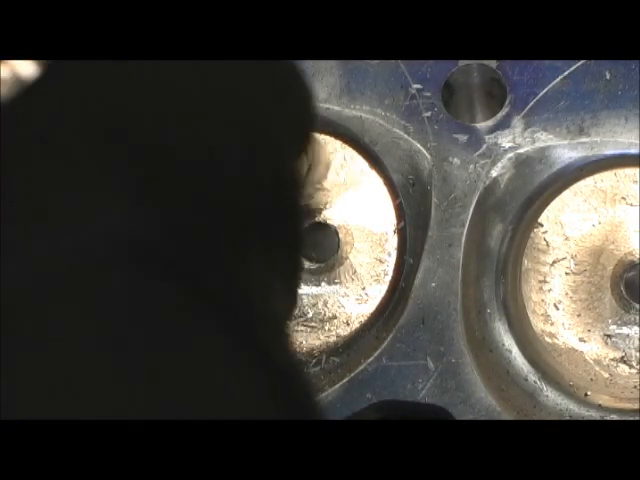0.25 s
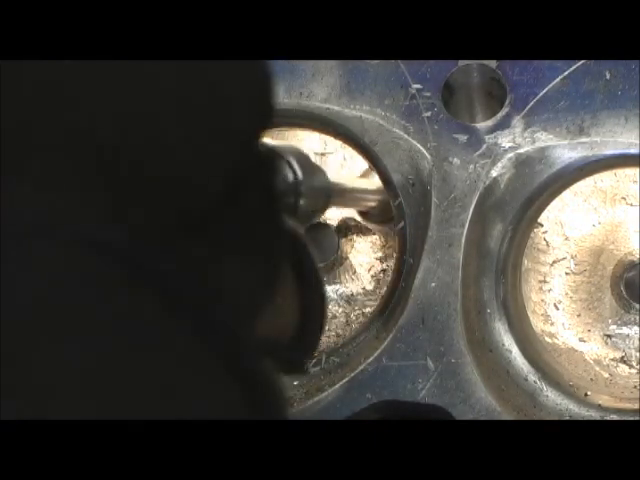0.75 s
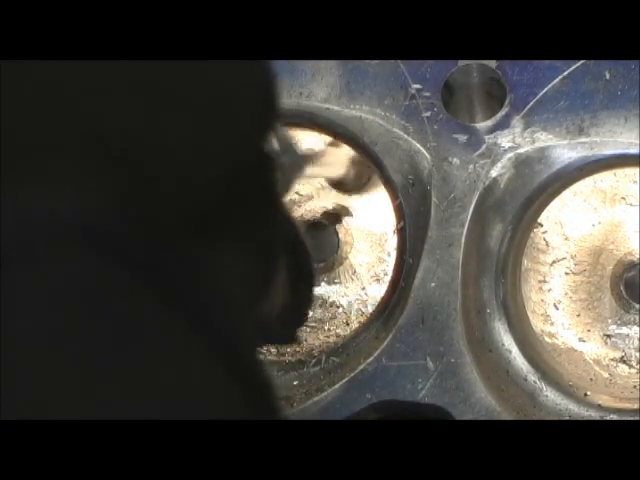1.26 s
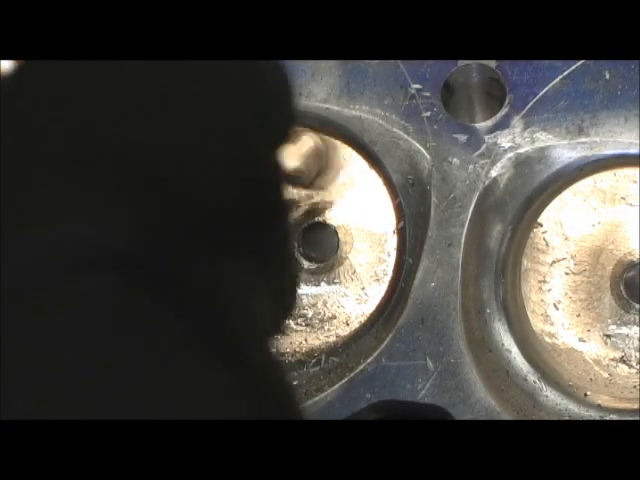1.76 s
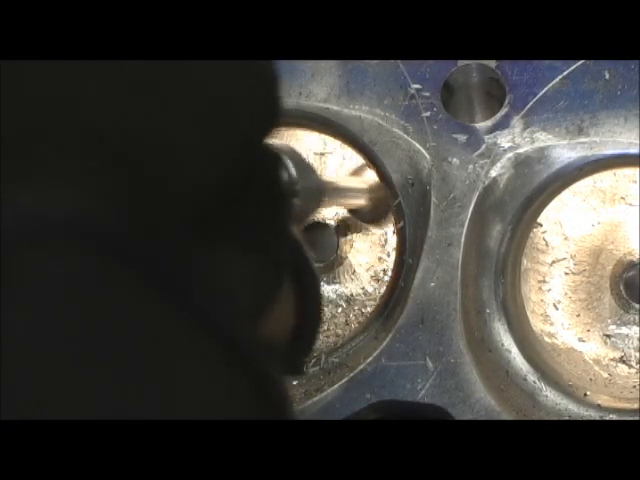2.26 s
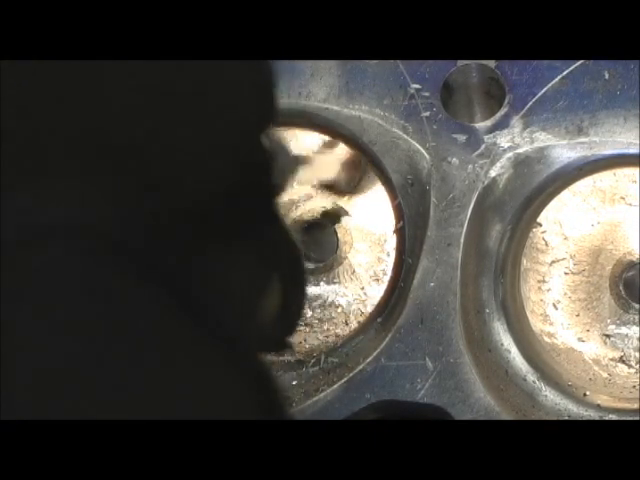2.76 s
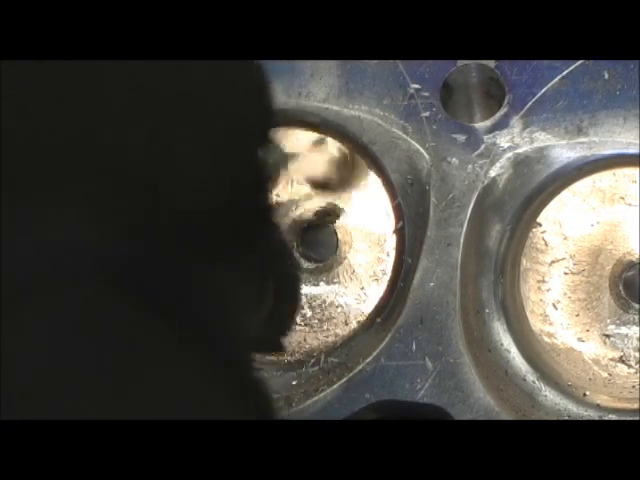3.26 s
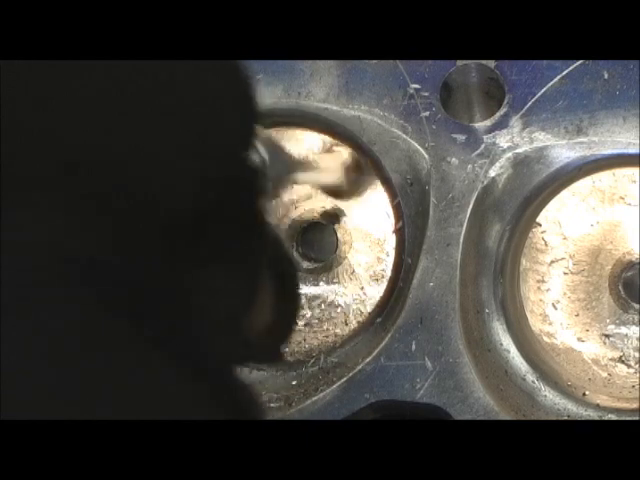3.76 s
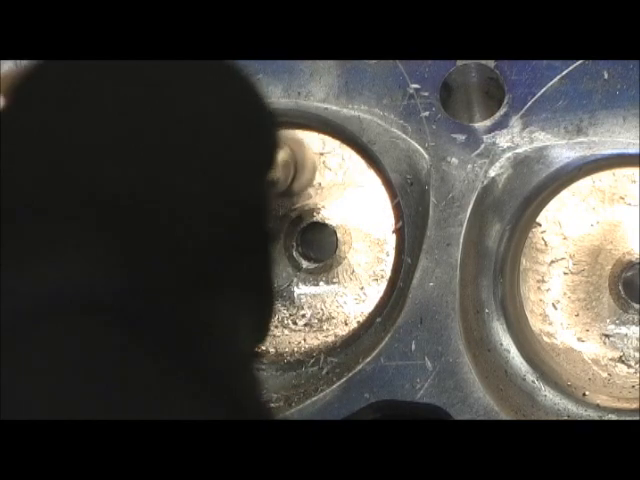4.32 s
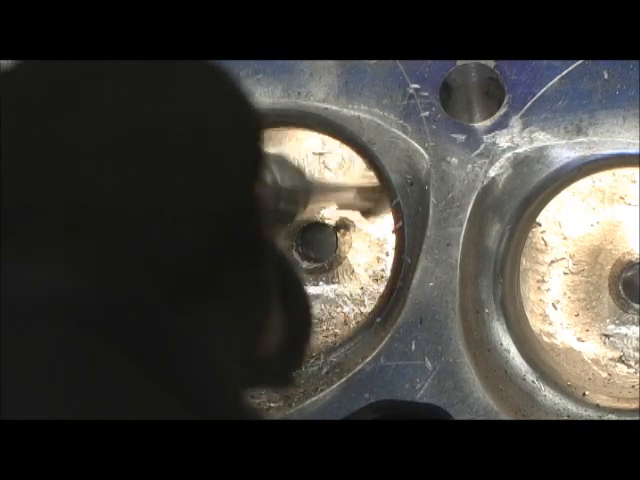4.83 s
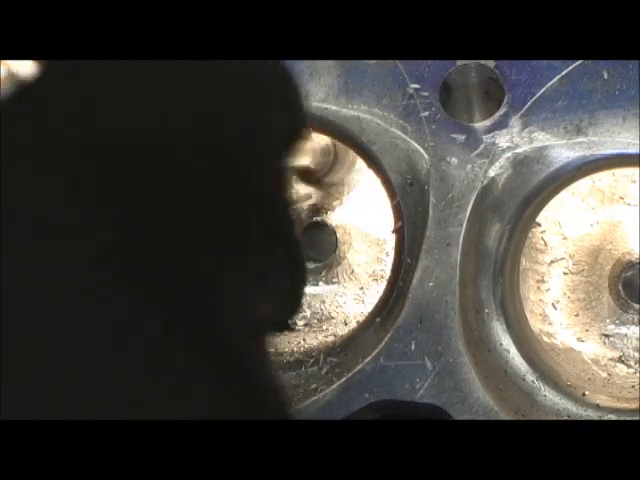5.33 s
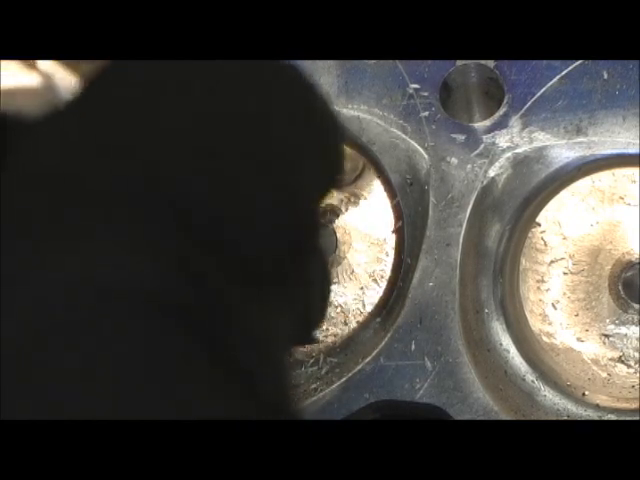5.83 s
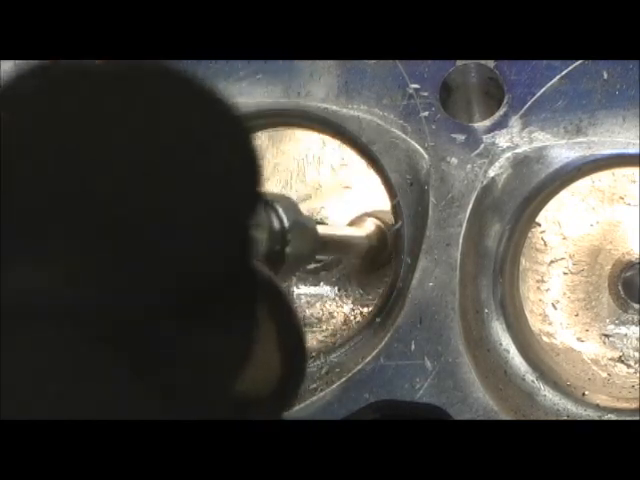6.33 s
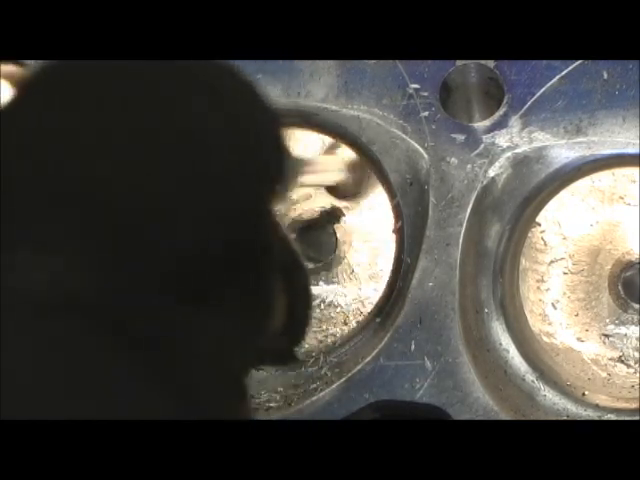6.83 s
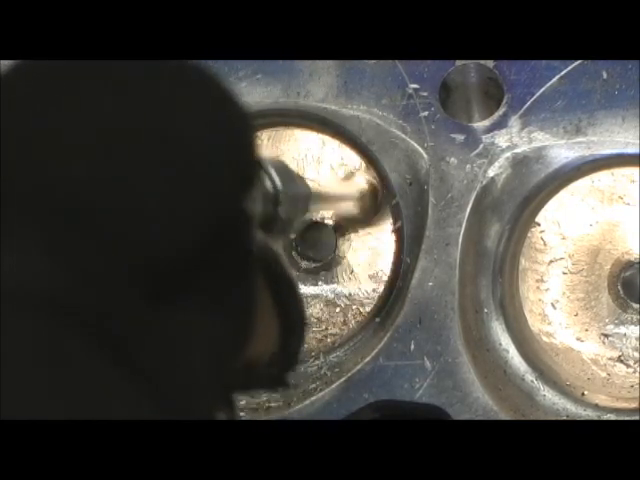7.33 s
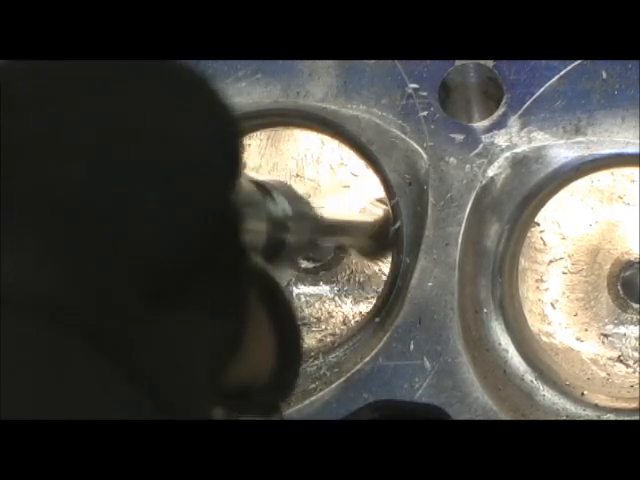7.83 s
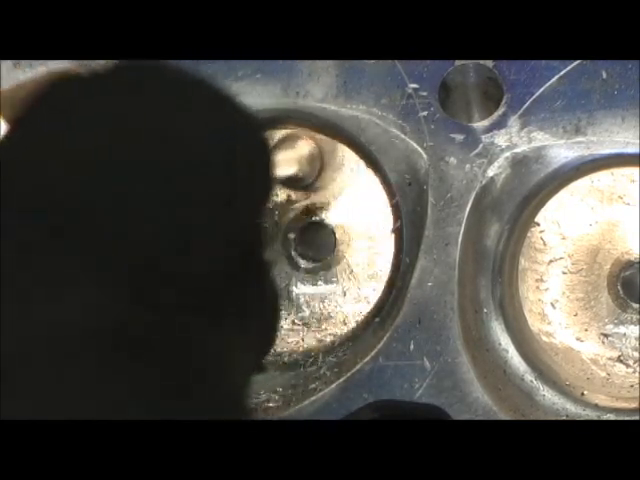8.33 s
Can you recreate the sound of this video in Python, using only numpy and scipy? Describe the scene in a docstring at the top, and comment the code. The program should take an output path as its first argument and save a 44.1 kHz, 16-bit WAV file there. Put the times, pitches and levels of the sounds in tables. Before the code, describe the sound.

An air die grinder runs continuously, very close, its burr working to and fro inside a metal casting. The high whine sags and recovers several times a second, over rough scratching, exhaust roar and faint shaft hum. Metal walls ring briefly in turn and tiny clicks mark snags. Toward the end strokes flutter more, and the whine drops at the last moment. Low workshop rumble sits behind; close stereo microphone, bass centred and treble wide.

```python
"""An air die grinder sweeps a carbide burr to and fro inside a cylinder head port, close by in a workshop.
Its five motor vanes make a sine whine that bogs down and recovers with each stroke, over a shaft hum.
Shaped noise makes the burr's scratch and the roar of exhaust air and chips; resonances ring the casting.
Singing tones mark the walls, short bursts are snags, and low noise with booms is the workshop."""
import sys
import numpy as np
from scipy import signal
from scipy.fft import rfft, irfft
from scipy.io import wavfile
from scipy.ndimage import uniform_filter1d

SR = 44100
rng = np.random.default_rng(int(sys.argv[2]) if len(sys.argv) > 2 else 0)


def output_pcm(signal):
    """Save a mono or channel-first signal as 16-bit PCM at the path in sys.argv[1].

    Samples are clipped to [-1, 1] before scaling.
    """
    pcm = np.clip(np.atleast_2d(signal).T, -1, 1) * 32767
    wavfile.write(sys.argv[1], SR, np.round(pcm).astype(np.int16))


N = 378378  # length of the scene [samples]

# strokes of the hand: the motor bogs down at the turn, recovers, then sags; later smoothing rounds the rates
# (slowest moment [s], slowest vane rate [Hz], recovery time [s], fastest vane rate [Hz],
#  bite swell [dB], low wall swell [dB], high wall swell [dB], shaft overtone swell [dB])
HAND_STROKES = [(-0.2, 1200, 0.15, 1300, 0.0, -45, -45, -45), (0.15, 1248, 0.14, 1362, 1.5, -31, -45, -41),
                (0.5, 1245, 0.13, 1375, 1.0, -31, -31, -41), (0.92, 1248, 0.12, 1350, 1.5, -31, -31, -41),
                (1.32, 1355, 0.028, 1392, 1, -31, -31.5, -41), (1.62, 1332, 0.07, 1407, 2, -32, -38, -36),
                (1.959, 1292, 0.13, 1368, 1.5, -38, -45, -41),
                (2.341, 1230, 0.15, 1397, 3.5, -29, -31, -35), (2.79, 1318, 0.02, 1365, 2.5, -36, -33, -35),
                (3.07, 1268, 0.1, 1406, 3.5, -30, -32, -30.5),
                (3.42, 1283, 0.087, 1398, 4.5, -32, -38, -31), (3.77, 1251, 0.094, 1378, 4, -32, -35, -34),
                (3.91, 1299, 0.28, 1330, 1.5, -45, -45, -41), (4.24, 1267, 0.12, 1383, 3.5, -29, -39, -35),
                (4.631, 1283, 0.095, 1384, 3.5, -32, -32, -31),
                (4.96, 1299, 0.051, 1367, 0.5, -45, -32.5, -30.5),
                (5.12, 1301, 0.13, 1313, -0.5, -45, -45, -41), (5.28, 1245, 0.31, 1306, 1.0, -45, -45, -41),
                (5.69, 1141, 0.28, 1310, 1, -36, -42, -41), (6.26, 1278, 0.1, 1309, 2.5, -45, -49, -41),
                (6.42, 1256, 0.071, 1304, 2, -45, -40, -41), (6.78, 1315, 0.02, 1375, 2.5, -40, -45, -41),
                (7.05, 1336, 0.07, 1388, 3.5, -45, -43, -41), (7.19, 1320, 0.17, 1340, 3.5, -45, -38, -41),
                (7.57, 1300, 0.059, 1383, 3.5, -45, -48, -41), (7.7, 1300, 0.19, 1343, 0, -45, -31, -41),
                (7.97, 1263, 0.1, 1330, 1.0, -45, -39, -41), (8.14, 1253, 0.11, 1323, 0, -45, -47, -41),
                (8.3, 1268, 0.11, 1326, 3.0, -31.5, -43, -41), (8.54, 1125, 0.17, 1206, 2.5, -45, -45, -41)]
# slow levels: (time [s], vane tone [dB], shaft hum before its resonance [dB], bite [dB], roar [dB],
#  low wall between rings [dB], high wall between rings [dB])
SLOW_LEVELS = [(0, -29.5, -44, -24.5, -23, -48, -44), (.7, -27.5, -45, -24.5, -23, -46, -45),
               (1.5, -29.5, -43.5, -25, -24, -44, -44), (2.2, -29, -44, -24, -23.5, -44, -35),
               (3, -29.5, -47, -23.5, -26, -41, -39.5), (3.9, -27, -46, -25.5, -24, -43, -43),
               (4.7, -27, -51, -23, -24, -44, -37), (5.3, -28, -42.5, -25, -22.5, -50, -38),
               (5.8, -30, -44.5, -23.5, -23.5, -48, -41), (6.4, -24, -41, -24.5, -22.5, -46, -33.5),
               (6.9, -26, -43.5, -25, -22.5, -44, -37.5), (7.6, -26.5, -45.5, -23.5, -23, -49, -33.5),
               (8.2, -24, -41, -23.5, -22, -46, -37), (8.45, -27, -47, -23, -24, -33, -37),
               (8.58, -31, -46, -22, -21, -37, -33)]
# brief dips in level, deepest in the roar, slight in the vane tone: (time [s], depth in the bite [dB])
LEVEL_DIPS = [(0.35, 1), (0.58, 3.5), (2.81, 3.5), (2.97, 0.5), (3.44, 2), (3.81, 0.5), (4.04, 3.5),
              (4.29, 1), (4.66, 5.5), (4.9, 1.5), (4.96, 3.5), (5.34, 1.5), (5.7, 2), (7.24, 2.5)]
# bench resonance under the shaft hum: (centre [Hz], width [Hz])
HUM_RESONANCE = (263.4, 9)
# a second resonance, under twice the shaft rate: (centre [Hz], width [Hz], drive over the hum's [dB])
HUM_OCTAVE_RESONANCE = (516, 21, -3.5)
# shaft overtones heard through a port resonance: (multiple of the shaft rate [times], centre [Hz], width [Hz])
SHAFT_OVERTONES = [(7, 1950, 250), (9, 2470, 300)]
# colour of the burr's scratch: (frequency [Hz], relative level per Hz [dB])
SCRATCH_COLOUR = [(1500, -30), (3000, -4), (6000, -8), (8200, 0), (9600, -4), (11500, -8.5), (12900, -15.5),
                  (14500, -12), (15800, -21)]
# resonances of the casting: (centre [Hz], width [Hz])
CASTING_MODES = [(2000, 90), (2500, 120), (2833, 30), (4530, 16), (5610, 18), (7355, 24), (7998, 45),
                 (8257, 90), (8451, 32), (9100, 150), (10833, 22), (11787, 22)]
# level of each casting resonance over the bite, in the same order: (level [dB])
CASTING_LEVELS = [-11.5, -9.5, -14.5, -17, -23.5, -33, -27, -11, -19, -15.5, -38, -22.5]
# colour of the roar of air and chips: (frequency [Hz], relative level per Hz [dB])
ROAR_COLOUR = [(410, -71), (700, -28), (1050, -2), (1210, -8), (1340, 0.5), (1800, -2.5), (1990, 3),
               (2290, 0), (2550, 1), (3660, -6.5), (6000, -12.5), (7800, -2.5), (13200, -120)]
# the two walls that sing, low then high: (centre [Hz], width [Hz])
WALLS = [(3165, 16), (3341, 7)]
# colour of the workshop rumble: (frequency [Hz], relative level per Hz [dB])
SHOP_COLOUR = [(59, -45), (100, -26), (144, -25.5), (243, -17.5), (500, -9), (778, -13), (1000, -9),
               (1300, -25), (2200, -120)]
# slow changes in the workshop: (time [s], rumble level [dB], change in the deepest booms [dB])
RUMBLE_LEVELS = [(0, -39.5, 0), (1.5, -41, 2.5), (4.6, -42.5, 1.5), (5.2, -39, -1), (6.7, -37.5, -4.5),
                 (7, -39.5, -3.5), (8, -39, -2), (8.58, -38.5, 4.5)]
# room and bench resonances: (centre [Hz], width [Hz], level before slow changes [dB])
SHOP_BOOMS = [(77.4, 27, -62.5), (104, 23, -59.5), (192.8, 18, -54), (222, 18, -53.5), (326.4, 33, -53),
              (406.6, 30, -51.5), (515.2, 21, -47.5), (579, 37, -53.5)]
# the burr snags: (time [s], strength before the knock and edge gains [dB])
BURR_SNAGS = [(0.1393, -8), (0.1867, -10), (0.3288, -9), (0.5039, -9), (1.0611, -8), (1.2769, -9),
              (1.7964, -9), (2.0141, -10), (2.1506, -9), (2.2474, -9), (2.2981, -9), (2.3815, -9),
              (2.7389, -9), (2.7839, -10), (2.8645, -9), (2.935, -9), (2.9927, -10), (3.0349, -10),
              (3.3058, -9), (3.3699, -10), (4.0139, -8), (4.1127, -10), (4.5075, -10), (4.559, -8),
              (4.6013, -9), (4.8522, -8), (4.9313, -7), (5.0356, -8), (5.2712, -9), (5.3773, -8),
              (5.425, -9), (5.6343, -9), (5.8254, -9), (6.5389, -8), (6.9072, -10), (7.0402, -7),
              (7.128, -7), (7.3822, -6), (7.4572, -8), (8.2938, -9)]
# how two microphone ports hear the scene, by side (half their difference) and mid (half their sum):
# (frequency [Hz], side minus mid [dB], in-step share [0-1, signed], quarter-cycle share [0-1, signed])
MIC_PORTS = [(700, -67.5, -0.39, 0), (2360, -75, -0.38, 0), (3770, -23.5, -0.11, -0.087),
             (6440, -8, -0.081, 0.11), (7850, -12.5, -0.36, 0.73), (10900, 0.5, -0.08, 0.68),
             (12900, 0, 0.54, .5), (15500, -4, 0.18, 0.26)]

VANES = 5  # vane pulses in one turn of the shaft
CREST_POWER = 1.8  # rounds the fast crests and leaves the slow turns pointed
DIP_WIDTH_S, DIP_ROAR, DIP_VANE = 0.02, 1.8, 0.31  # last two: dB per dB of the bite's dip
OVERTONE_WIDTH_S = 0.046
BITE_LAG_S, BITE_WIDTH_S = 0.055, 0.04  # the bite swells just after the fastest moment
ROAR_SHARE = 0.26  # the roar follows part of the bite swell [dB per dB]
LOW_WALL_LAG_S, LOW_WALL_WIDTH_S = 0.057, 0.053  # rings after the fastest moment
HIGH_WALL_LEAD_S, HIGH_WALL_WIDTH_S = 0.036, 0.05  # rings before the slowest moment
SNAG_BODY, SNAG_EDGE = (1750, 2000), (8200, 6000)  # resonances (centre [Hz], width [Hz])
TOP_HZ = 15800  # highest pitch that passes


def undb(db):
    """Turn decibels into gain."""
    return 10 ** (np.asarray(db) / 20)


def unit(x):
    """Scale to an rms (average strength) of 1."""
    return x / np.sqrt(np.mean(x ** 2))


def curves(table):
    """Draw the columns of a time table as lines, one value a sample."""
    s, *columns = np.transpose(table)
    return [np.interp(np.arange(N) / SR, s, c) for c in columns]


def over_hz(table):
    """Draw the columns of a frequency table as lines over log frequency, one value a transform bin."""
    hz, *columns = np.transpose(table)
    bin_hz = np.arange(N // 2 + 1) * SR / N
    return [np.interp(np.log(bin_hz + 1), np.log(hz), c) for c in columns]


def colour(x, table):
    """Filter x by the table's frequency levels, then scale to rms 1."""
    return unit(irfft(rfft(x) * undb(over_hz(table)[0]), N))


def ring(x, hz, width_hz):
    """Pass x through one resonance, with gain 1 at its centre."""
    return signal.lfilter(*signal.iirpeak(hz, hz / width_hz, SR), x)


def walk(rate):
    """Wander at random: levels held 1 / rate seconds, smoothed twice, rms 1."""
    hold = max(int(SR / rate), 1)
    steps = np.repeat(rng.standard_normal(N // hold + 1), hold)
    return unit(uniform_filter1d(uniform_filter1d(steps, hold), hold)[:N])


def noise():
    """Two unrelated rows of hiss: what both microphone ports share, and what differs between them."""
    return rng.standard_normal((2, N))


def swells(times, heights, width_s):
    """Add up a bell-shaped swell at each time."""
    t = np.arange(0, N, 64) / SR  # a coarse time grid is enough for slow bells
    bells = np.exp(-.5 * ((t[:, None] - times) / width_s) ** 2)
    return np.interp(np.arange(N) / SR, t, bells @ heights)


def dip_db():
    """Brief bell-shaped dips in level, as a negative number of dB."""
    return -swells(*np.transpose(LEVEL_DIPS), DIP_WIDTH_S)


def vane_rate():
    """Vane rate climbs from each slowest moment to a rounded crest and falls ever faster to the next."""
    s, slow_hz, rise_s, fast_hz = np.transpose(HAND_STROKES)[:4]
    turning_s = np.ravel([s, s + rise_s], order="F")  # slowest, fastest, slowest, ...
    turning_hz = np.ravel([slow_hz, fast_hz], order="F")
    count = np.arange(2 * len(s))
    step = np.interp(np.arange(N) / SR, turning_s, count)
    height = 1 - np.abs(step % 2 - 1) ** CREST_POWER
    climbing = step % 2 < 1
    eased = np.floor(step) + np.where(climbing, height, 1 - height)
    return uniform_filter1d(np.interp(eased, count, turning_hz), size=1500)


def motor():
    """The vane tone wavers and flutters; the shaft hums a fifth as fast; overtones sing in mid recovery."""
    vane_hz = vane_rate() * (1 + 0.00392 * walk(60))
    vane_db, hum_db = curves(SLOW_LEVELS)[:2]
    turn = 2 * np.pi * np.cumsum(vane_hz) / SR / VANES  # shaft angle
    vane_db = vane_db + DIP_VANE * dip_db() + 1.2 * walk(9) + 1.72 * walk(50)
    out = undb(vane_db) * np.sin(VANES * turn)
    out = out + undb(hum_db + 1.6 * walk(4.02)) * ring(np.sin(turn), *HUM_RESONANCE)
    octave_hz, octave_width, octave_db = HUM_OCTAVE_RESONANCE
    octave = ring(np.sin(2 * turn), octave_hz, octave_width)
    out = out + undb(hum_db + octave_db + 3.1 * walk(7)) * octave
    s, _, rise_s, *_, sing_db = np.transpose(HAND_STROKES)
    sing = swells(s + 0.7 * rise_s, undb(sing_db), OVERTONE_WIDTH_S) + undb(-49)
    for order, hz, width in SHAFT_OVERTONES:
        out = out + ring(sing * undb(2 * walk(12)) * np.sin(order * turn), hz, width)
    return np.sqrt(2) * out  # a sine needs this peak for rms 1


def burr():
    """Uneven contact makes scratch and roar lumpy together; bigger chips thump in the roar; casting rings."""
    s, _, rise_s, _, swell_db = np.transpose(HAND_STROKES)[:5]
    swell_db = swells(s + rise_s + BITE_LAG_S, swell_db, BITE_WIDTH_S)
    bite_db, roar_db = curves(SLOW_LEVELS)[2:4]
    lumps_db = 0.78 * walk(9) + 0.73 * walk(25) + 1.17 * walk(150)
    chip_sizes = np.minimum(rng.exponential(size=N // 30 + 1), 6.5)  # mostly small, a few big
    chips = uniform_filter1d(np.repeat(chip_sizes, 30)[:N], size=30)
    contact = undb(lumps_db + chips)
    scratch = colour(contact * noise(), SCRATCH_COLOUR)
    drive = contact * noise()
    for (hz, width), db in zip(CASTING_MODES, CASTING_LEVELS):
        mode_db = db + 0.45 * swell_db + walk(5) + 2.5 * walk(20)
        scratch = scratch + undb(mode_db) * unit(ring(drive, hz, width))
    roar = colour(undb(0.85 * lumps_db + 2.2 * chips) * noise(), ROAR_COLOUR)
    bite_db = bite_db + swell_db + dip_db()
    roar_db = roar_db + ROAR_SHARE * swell_db + DIP_ROAR * dip_db()
    return undb(bite_db) * scratch + undb(roar_db) * roar


def chatter(hz, width_hz):
    """A wall that sings: a slightly unsteady tone with noise ringing round it."""
    tone = np.sqrt(2) * np.sin(2 * np.pi * np.cumsum(hz + 6.0 * walk(15)) / SR)
    return unit(1.6 * tone + unit(ring(noise(), hz, width_hz)))


def walls():
    """Each stroke takes the burr past one wall and then the other, and each wall sings in turn."""
    s, _, rise_s, _, _, low_db, high_db, _ = np.transpose(HAND_STROKES)
    low = swells(s + rise_s + LOW_WALL_LAG_S, undb(low_db), LOW_WALL_WIDTH_S)
    high = swells(s - HIGH_WALL_LEAD_S, undb(high_db), HIGH_WALL_WIDTH_S)
    out = 0
    for swell, steady_db, mode in zip((low, high), curves(SLOW_LEVELS)[4:], WALLS):
        out = out + (swell + undb(steady_db + 2.2 * walk(8))) * chatter(*mode)
    return out


def shop():
    """Low workshop rumble booms in room and bench resonances; the upper ones swell with it."""
    rumble_db, deep_db = curves(RUMBLE_LEVELS)
    out = undb(rumble_db) * colour(noise(), SHOP_COLOUR)
    for hz, width, db in SHOP_BOOMS:
        swell_db = (rumble_db - rumble_db.mean()) * (hz > 300) + deep_db * (hz < 150)
        boom = unit(ring(ring(noise(), hz, width), hz, width))
        out = out + undb(db + swell_db + walk(3.15)) * boom
    return out


def snags(count=220, small_db=-14):
    """Each snag is a low knock and a bright millisecond burst; many more fall at random, mostly smaller."""
    small = rng.random((count, 2)) * [N / SR, 5.0] + [0, small_db]  # random time [s] and strength [dB]
    knock, edge = np.zeros((2, 2, N + 220))
    fade = np.exp(-np.arange(220) / SR / .0008)
    for s, db in [*BURR_SNAGS, *small]:
        i = int(s * SR)
        knock[0, i] += undb(db + 23.5)  # one click, in the shared row only
        edge[:, i:i + 220] += undb(db - 1.0) * fade * rng.standard_normal((2, 220))
    knock = ring(ring(knock, *SNAG_BODY), *SNAG_BODY)
    edge = ring(ring(edge, *SNAG_EDGE), *SNAG_EDGE)
    return (knock + edge)[:, :N]


def scene():
    """Two close microphone ports agree in the bass and part in the treble, where one of them leads."""
    mid, apart = rfft(motor() + burr() + walls() + shop() + snags())
    side_db, in_step, quarter = over_hz(MIC_PORTS)
    free = np.sqrt(np.clip(1 - in_step ** 2 - quarter ** 2, 0, 1))  # share unrelated to mid
    side = undb(side_db) * ((in_step + 1j * quarter) * mid + free * apart)
    return irfft(np.array([mid + side, mid - side]), N)


def record(dry, top=0.22, duck_strength=12.0, release_s=0.024):
    """Peaks over the threshold duck the gain for a moment and are rounded; then the top treble is cut."""
    loudness = uniform_filter1d(np.abs(dry).max(axis=0), size=24)
    over = np.maximum(loudness - top, 0)
    keep = np.exp(-1 / (release_s * SR))
    duck_db = np.minimum(duck_strength * signal.lfilter([.04], [1, -keep], over), 8)  # at most 8 dB
    rounded = np.tanh(dry * undb(-duck_db))
    top_cut = signal.ellip(14, .2, 90, TOP_HZ, fs=SR, output="sos")
    return signal.sosfilt(top_cut, rounded)


dry = scene()
out = record(dry)
output_pcm(out)
```